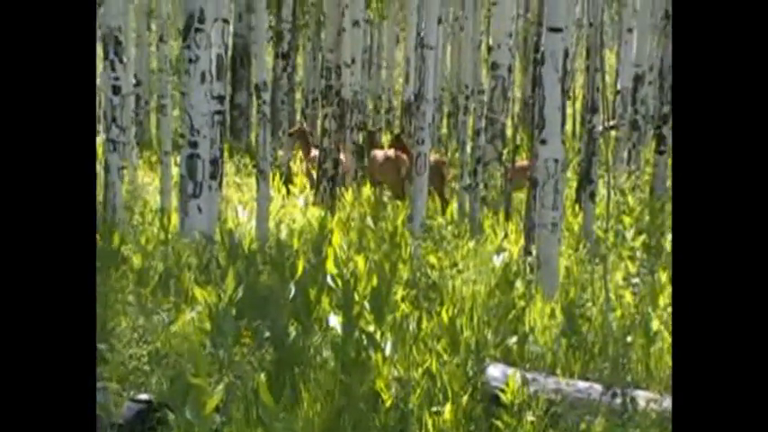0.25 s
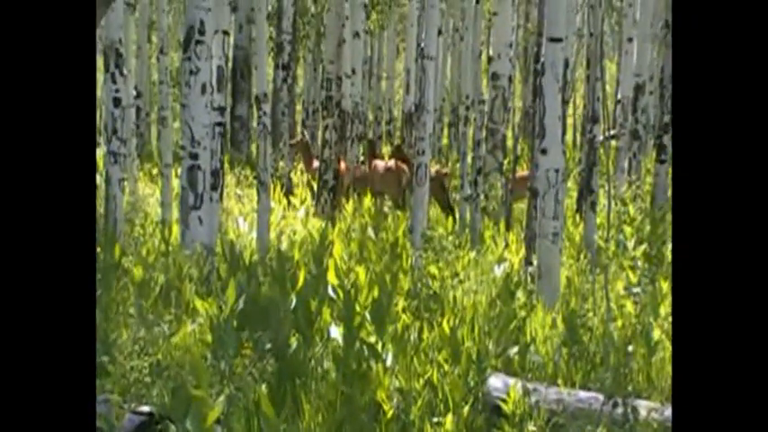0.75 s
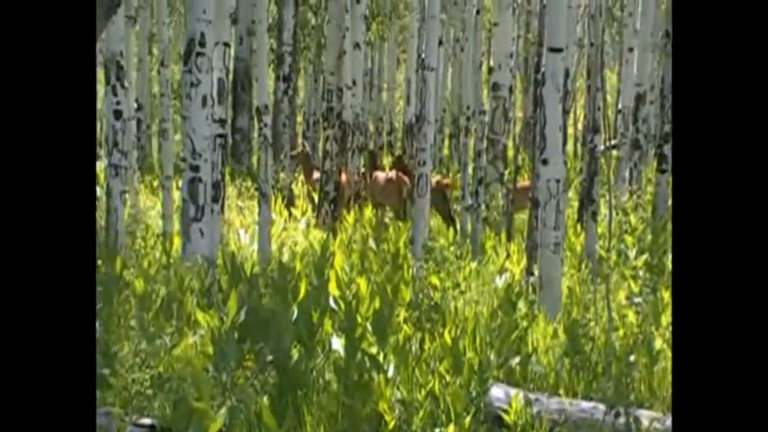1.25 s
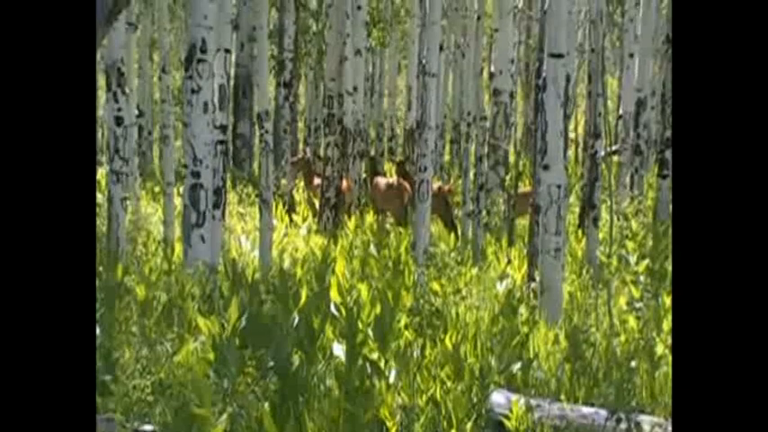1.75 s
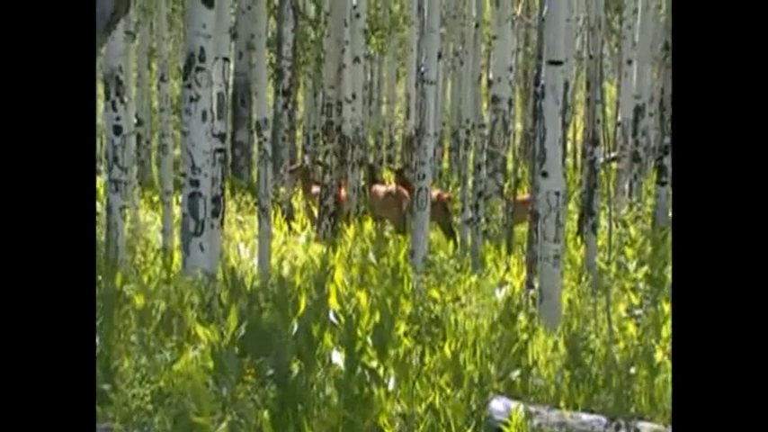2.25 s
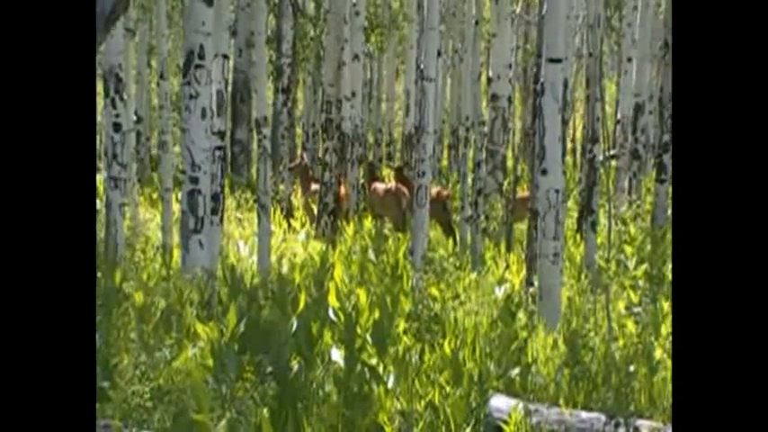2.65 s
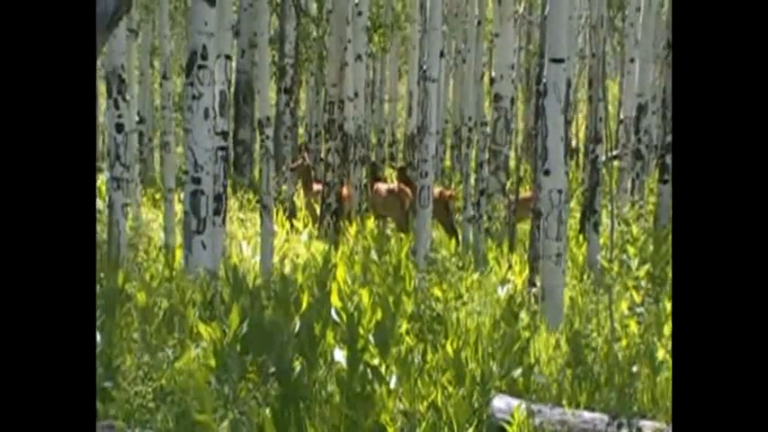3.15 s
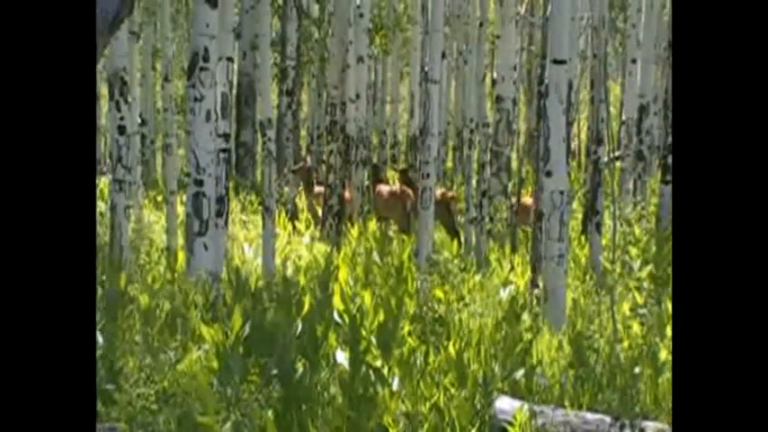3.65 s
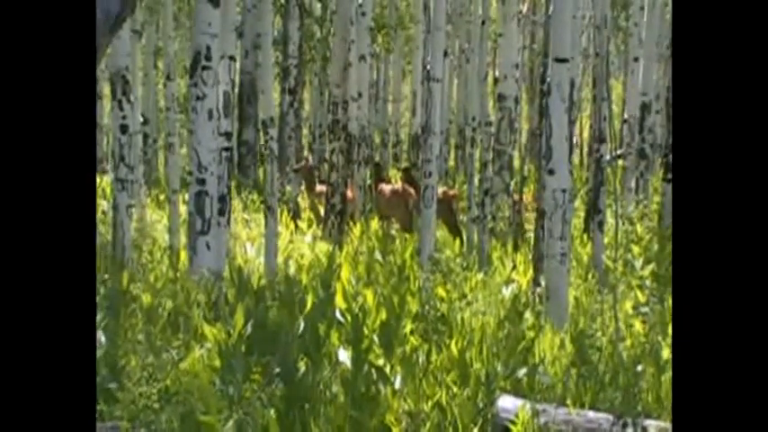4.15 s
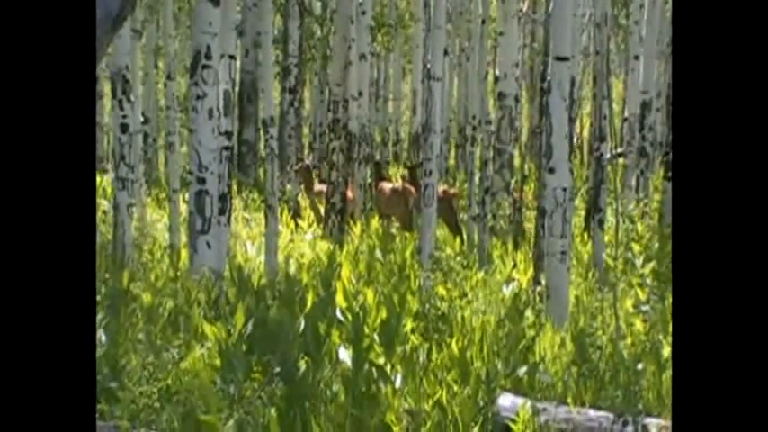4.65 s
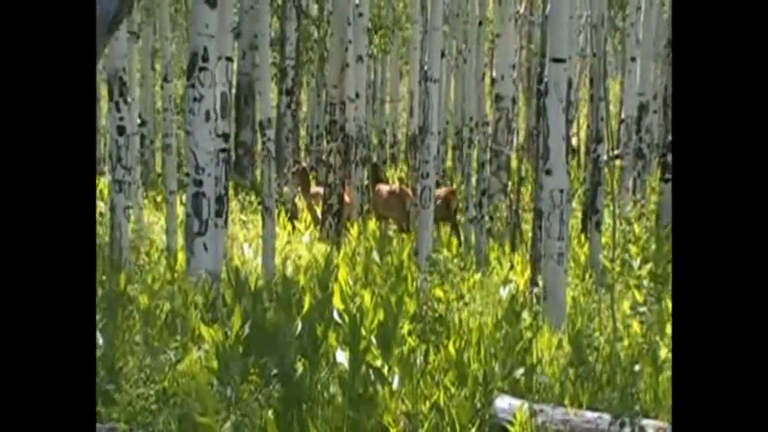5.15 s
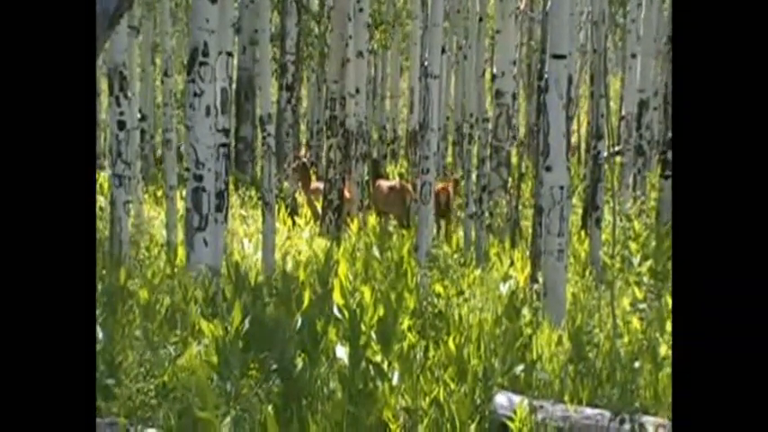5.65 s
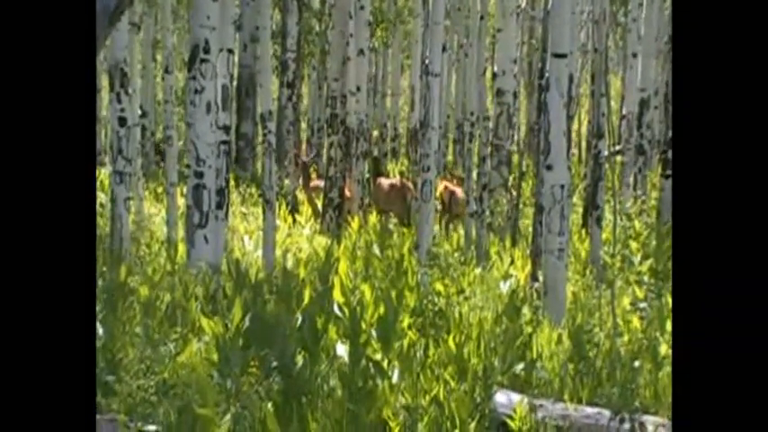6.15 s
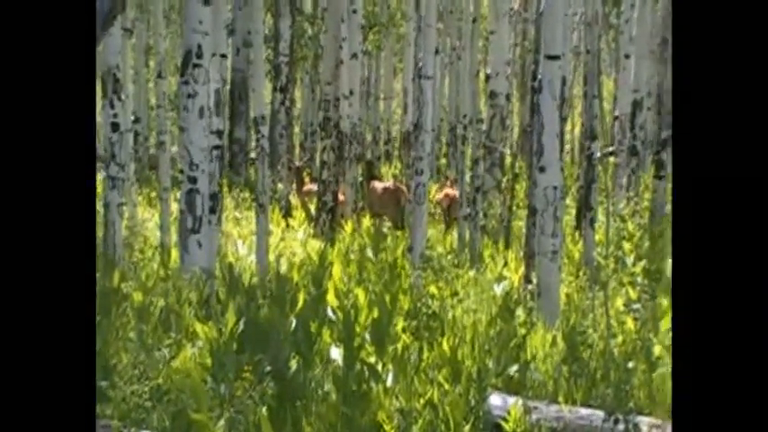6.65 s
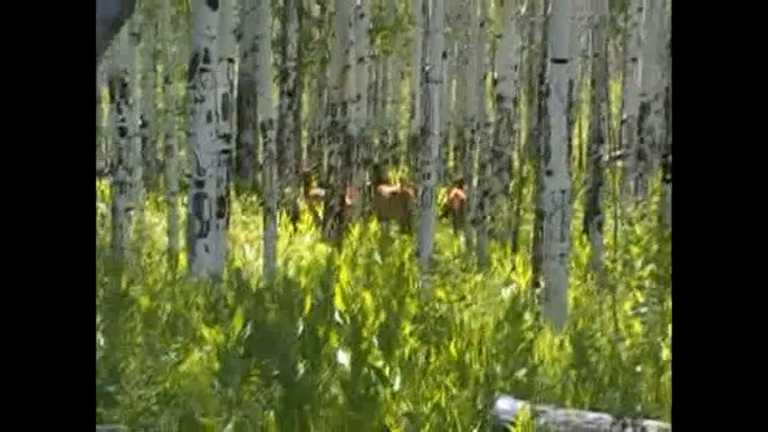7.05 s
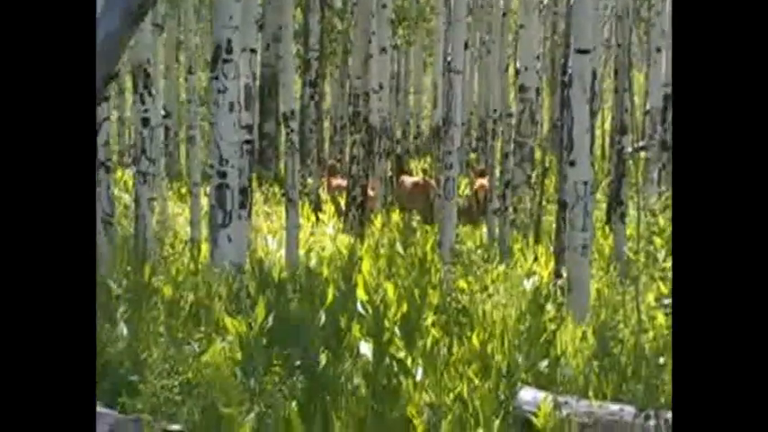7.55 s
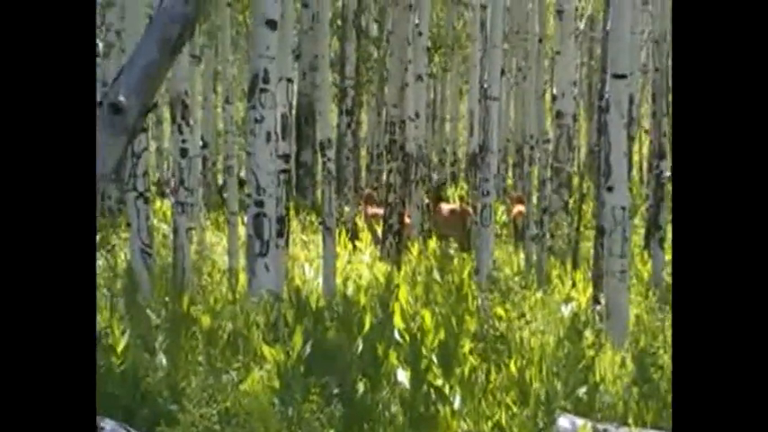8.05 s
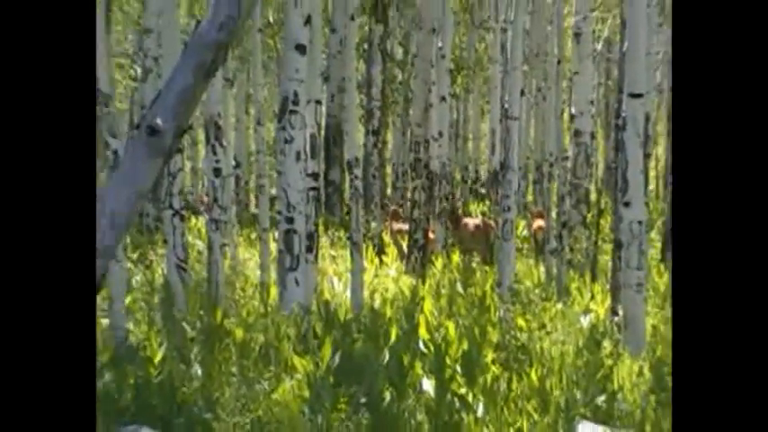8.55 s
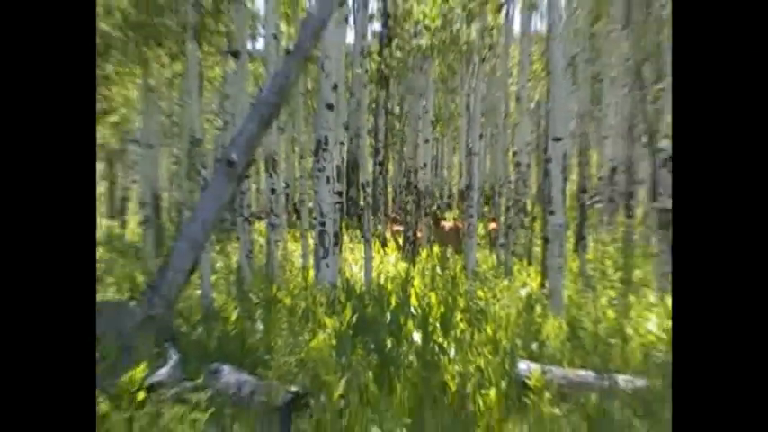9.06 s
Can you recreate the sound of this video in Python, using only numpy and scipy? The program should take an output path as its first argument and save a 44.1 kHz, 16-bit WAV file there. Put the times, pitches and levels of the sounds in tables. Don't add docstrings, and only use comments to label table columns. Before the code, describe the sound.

Outdoors in a leafy grove, short high elk mews hold then drop, hazily echoing, with far chirps, soft creaks and dry ticks near the microphone.

```python
import sys
import numpy as np
from scipy import signal
from scipy.io import wavfile
from scipy.ndimage import uniform_filter1d

SR = 44100
rng = np.random.default_rng(int(sys.argv[2]) if len(sys.argv) > 2 else 0)


def materialize(psi):
    bounded = np.clip(np.atleast_2d(psi).T, -1, 1)
    quanta = np.round(bounded * 32767).astype(np.int16)
    wavfile.write(sys.argv[1], SR, quanta)


def gain_from_db(level_db):
    decades = np.asarray(level_db, float) / 20
    return 10 ** decades


N = 410130

# (frequency [Hz], level per Hz [dB])
LEAF_COLOUR = [(25, -55), (55, -1), (200, -4), (550, -7.5), (850, -7.5), (1400, -8.5), (1900, -15.5),
               (2900, -11.5), (4300, -20), (5500, -15.5), (6500, -17), (9600, -28), (10400, -34.5),
               (15000, -21.5)]
# (frequency [Hz], likeness [0 to 1])
LEAF_LIKENESS = [(60, 0.99), (380, 0.96), (2380, 0.98), (15000, 0.87)]
# (frequency [Hz], left minus right [dB])
LEAF_LEAN = [(60, 2.7), (180, 7), (550, 5.7), (1650, 2.6), (4970, 1.6), (15000, 1.5)]
# (time [s], lift [dB])
STIR = [(0, 3), (.4, 0), (2.4, 1.5), (4, 0.5), (4.498, 5.5), (5.5, 3.5), (6, 4), (6.7, 7), (7.3, 3.5),
        (7.6, 4.5), (8.2, 4.5), (8.7, 5), (9.3, 3)]
# (frequency [Hz], level [dB])
EARLIER_ECHO = [(1460, -49.5), (2950, -55), (3550, -56)]
# (frequency [Hz], time to fall 60 dB [s])
GROVE_DECAY = [(800, 0.76), (1500, 0.5), (3000, 0.53), (6000, 0.49), (12000, 0.37)]
# (delay [s], level [dB])
NEAR_TRUNKS = [(.006, -10), (0.012, -9.5), (0.019, -13), (.035, -40)]
# (frequency [Hz], level [dB])
HAZE_COLOUR = [(1000, -12), (1500, -3), (3000, -2.5), (3750, -3), (5000, -5), (9000, 0.5)]
# (start [s], length
# [s], first pitch [Hz], last pitch [Hz], level [dB])
CHIRPS = [(1.238, 0.04, 2800, 2960, -59), (1.27, .07, 2950, 2850, -66), (1.44, .035, 3300, 3400, -67),
          (1.307, 0.046, 2350, 2230, -71), (1.394, 0.037, 2480, 2290, -69),
          (1.829, 0.038, 2720, 3104, -63), (2.04, 0.093, 2870, 2650, -71),
          (2.402, .02, 3950, 3400, -58), (5.67, .02, 2150, 2150, -60), (4.575, .025, 6600, 5500, -62),
          (4.52, .04, 6400, 7100, -66), (4.51, 0.11, 2150, 2820, -60), (4.61, 0.06, 2762, 2820, -39),
          (5.356, 0.069, 2790, 2235, -59.5), (5.921, 0.097, 3285, 2530, -57),
          (5.455, 0.018, 2645, 2270, -52), (6.403, 0.088, 2200, 2490, -64),
          (6.459, 0.054, 2450, 2130, -59.5), (7.463, 0.028, 2740, 2600, -61.5),
          (7.525, 0.054, 2450, 2650, -65), (7.722, .04, 2055, 2260, -61),
          (7.751, 0.13, 2206, 2010, -62.5), (7.595, .045, 2150, 2720, -59),
          (5.82, .065, 4520, 4240, -62.5), (6.955, .045, 3900, 3040, -64),
          (7.878, 0.14, 1950, 1864, -59), (5.741, 0.051, 2810, 2930, -56),
          (5.875, 0.025, 2715, 2540, -51), (8.462, 0.16, 2290, 2090, -60.5),
          (8.728, .02, 2900, 2750, -58), (8.745, .027, 2990, 2750, -54.5), (8.79, .09, 2500, 2580, -66),
          (8.87, .05, 2570, 2350, -64), (8.965, 0.07, 2900, 2300, -56),
          (1.414, 0.024, 2830, 2670, -62), (2.013, 0.04, 5760, 4600, -77),
                   (2.13, 0.032, 5750, 4930, -69), (2.25, 0.036, 5630, 4470, -79),
                   (4.14, 0.043, 6700, 7240, -70), (4.201, .055, 7500, 5618, -67),
                   (4.334, 0.049, 7440, 5700, -67), (4.447, 0.049, 7000, 5200, -62),
                   (7.982, 0.12, 2640, 2024, -47.5), (7.985, 0.029, 3900, 3650, -59),
                   (8.019, .05, 3620, 3290, -51), (8.095, .03, 2760, 2700, -54),
                   (8.115, .04, 2700, 2150, -54), (8.25, .045, 4050, 3450, -60),
                   (7.69, .05, 1900, 2130, -65), (8.216, 0.079, 2525, 1620, -55),
                   (8.29, 0.06, 1600, 1450, -58), (6.225, .03, 3500, 3150, -53),
                   (5.98, .06, 2900, 2550, -63), (8.465, .035, 3600, 3780, -64),
                   (8.495, .09, 3790, 3590, -60), (8.45, .088, 3030, 2960, -65),
                   (8.583, .03, 2700, 2600, -56), (8.625, .02, 2560, 2520, -62),
                   (8.735, .02, 3320, 3200, -61), (8.755, .028, 3400, 3230, -57),
                   (8.898, .11, 2930, 2200, -61), (9.0, .05, 2950, 2400, -55), (8.96, .03, 3350, 3250, -62),
                   (9.01, .045, 3150, 2700, -61), (9.284, 0.033, 3160, 3200, -63)]
# (time [s], peak level [dB], ring [Hz])
KNOCKS = [(0.173, -47, 790), (0.399, -47.5, 1420), (1.237, -44, 737), (3.176, -38, 860),
          (3.775, -34.5, 1460), (4.595, -39, 895), (5.139, -32.5, 915), (5.44, -50.5, 660),
          (5.795, -43, 1190), (6.002, -47, 975), (6.102, -43, 1120), (6.685, -47, 490), (6.782, -41, 790),
          (7.02, -45.5, 840), (7.269, -43, 860), (7.359, -47, 970), (7.669, -39.5, 800), (7.703, -41, 820),
          (7.792, -40, 754), (7.824, -49, 670), (8.347, -49, 870), (8.487, -49.5, 790), (8.748, -41.5, 803),
          (8.936, -40.5, 770)]
# (time [s], peak level [dB], ring [Hz])
THUMPS = [
    (2.194, -59, 107),
    (5.462, -54, 184.4),
]
# (frequency [Hz], decay rate [1/s], level [dB])
SHELL_RINGS = [(1394, 140, -10.5), (584, 650, 3.5)]
# (time [s], peak level [dB], centre [Hz], length [s])
TICKS = [(4.069, -56, 6500, 0.0055), (4.113, -49.5, 6960, 0.0021), (4.183, -52, 6790, 0.0032),
         (5.133, -58, 7300, 0.01), (6.029, -45.5, 7550, 0.0087), (7.717, -48, 7160, 0.0025),
         (7.791, -41, 6800, 0.0028), (7.998, -55, 6800, 0.0075), (8.064, -43, 7700, 0.0012),
         (8.49, -33, 9200, 0.0014), (9.032, -49.5, 7200, 0.0044), (3.178, -59, 8000, 0.0024),
         (5.953, -69, 8190, 0.005), (6.022, -59, 9000, 0.0035), (6.1, -58, 9000, .003),
         (7.363, -53, 7050, .003), (8.154, -50, 10000, 0.0017), (7.08, -64.5, 8550, 0.085),
         (7.19, -63, 8300, 0.17), (8.487, -54, 9000, 0.0013), (8.584, -57, 7800, 0.0026),
         (4.42, -82, 8800, 0.011), (4.47, -74, 8000, 0.011)]
# (time [s], peak level [dB], centre [Hz], length [s])
SNAPS = [
    (0.397, -55, 2600, 0.006),
    (3.678, -52, 3070, 0.021),
    (4.444, -50, 5450, 0.0052),
    (4.595, -52, 7500, .003),
    (6.104, -47.5, 2274, 0.01),
    (7.021, -43, 1480, 0.0024),
    (7.269, -47, 1310, 0.004),
    (7.668, -49, 1500, 0.0023),
    (8.63, -55, 6400, 0.044),
]
# (start [s], length [s], level [dB], first ring [Hz], last ring [Hz])
CREAKS = [
    (0.0, 0.11, -54, 740, 830),
    (0.144, 0.096, -61.5, 820, 1020),
    (5.788, 0.14, -53.5, 1200, 1170),
    (6.668, 0.11, -57, 1050, 774),
    (6.811, 0.2, -57.5, 770, 895),
    (7, 0.22, -58.5, 900, 750),
    (7.195, 0.108, -54.5, 764, 900),
    (7.344, 0.091, -54.5, 930, 860),
    (7.661, 0.19, -58.5, 855, 814),
]
# (frequency [Hz], level [dB])
THROAT = [(2000, -30), (3000, 11), (3800, 2), (4500, -3), (5100, -7.5), (5550, 0.5), (6000, -16.5),
          (6900, -5), (7400, -9), (9000, -17), (10500, -21), (12000, -15), (14500, -17), (16000, -23)]
# (frequency [Hz], level [dB])
VOWEL = [(800, -7), (1100, 4), (1400, 1), (1800, -0.5), (2300, -7), (2900, 1), (3500, 6.5), (4400, -2.5)]
# (start [s], held pitch [Hz], effort [dB], swell [s], fade over the fall [dB])
MEWS = [(2.41, 1564, -32, 0.12, -17), (2.472, 1494, -24.5, 0.025, 43), (2.67, 1399, -33, 0.3, 22.5),
        (3.591, 1442, -34, 0.11, 16.5), (3.691, 1486, -28, 0.082, 29), (4.509, 1395, -29, 0.16, 11.5),
        (4.89, 1440, -34, 0.053, -15), (4.93, 1391, -22, 0.047, 32), (5.159, 1132, -54.5, 0.075, 4.5),
        (5.682, 1500, -55.5, 0.061, 5.5), (6.15, 1756, -44.5, 0.038, 15.5), (6.381, 1469, -57.5, 0.15, -8),
        (6.457, 1482, -28.5, 0.056, 31), (6.811, 1051, -54, 0.071, 8.5), (7.59, 1510, -44.5, 0.22, 0.5),
        (8.022, 1408, -53, 0.1, 3), (9.262, 1354, -62.5, 0.013, -10)]
# (onset pitch [Hz], hold [s], fall [s], final pitch [Hz], bend [+ flattens, - steepens])
TUNES = [(1590, .038, .02, 1400, -1), (1520, .103, .135, 860, .8), (1436, .105, .135, 765, .4),
         (1290, .213, .13, 820, 1.2), (1391, .14, .15, 900, -.1), (1340, .2, .14, 845, 1.3),
         (1520, .045, .01, 1405, .1), (1415, .073, .1, 890, .2), (1020, .09, .09, 980, -1),
         (1310, .16, .21, 840, .3), (1805, .07, .11, 1050, -.1), (1300, .085, .01, 1455, .1),
         (1460, .08, .145, 905, -.2), (780, .075, .11, 770, -3.2), (1030, .32, .19, 985, -.8),
         (1130, .162, .118, 885, -.6), (1385, .012, .03, 1290, .5)]
# (1st overtone [dB], 3rd and higher [dB], change of the 1st over the hold [dB],
# change of the 1st once the fall begins [dB], change of the 2nd once the fall begins [dB])
MOUTHS = [(-8, -3.5, 0, 7, -9), (0.5, -1, -7.5, -20, 5), (-8.5, 1.2, -12.5, 6, 0), (-6, 0, -4.5, -3.5, -6),
          (4, -1.5, -8.5, -12, 7.5), (-11, -4, -8, 1.5, -5), (0, -4, 6, 6, -0.5),
          (-3.5, -21, -7.5, -18, -2.5), (-30, -8, -3, 8.5, 0.5), (-5, -8, 7, 0, 4), (-2, 0, -5, -5, -7),
          (18, 6.5, -4, -1, -3), (-19.5, -4.5, -12.5, 23.5, 1), (-18, 6, -31, 5, -2),
          (-11, -15.5, -4, 4, -2.5), (-2.5, 0, 7, 0, 3), (14.5, -40, -13, -11.5, 9)]
# (pitch droop late in the hold [share], extra loss per upper overtone [dB],
# change of the 3rd once the fall begins [dB], loss in high air [dB per kHz], echo [dB])
ENDINGS = [(.001, -1.5, 4, 3, 3.5), (.001, 3, -2, 0.3, -2.5), (.001, 1, -3.5, 1, 2),
           (.045, 0.9, -3.5, 1.5, 2.5), (.001, 4, -2, -0.5, -0.7), (.003, 2, -2.5, 0, 2),
           (.001, 2, -4, 9, -11.5), (.001, -1, 3, 1.5, -3.5), (.001, 4, 1, -1.5, 6), (.001, -4, 0.5, 4, 2),
           (.001, 10, -1, 0.1, 1.5), (.001, -9, -2, 5, 0.1), (.001, 1.5, -2.5, 2.5, 3),
           (.001, -3, 8, 1, -11), (.001, 11, 1.5, 0.1, 2.5), (0.031, 4.5, 5, -3, -4), (.001, 11, 0, 0.1, 2)]
# (time [s], overtone [number], change [dB], half width [s])
CANCELS = [(2.536, 2, -3.5, 0.015), (2.52, 3, -23, 0.0046), (2.565, 2, 3.5, 0.025), (3.738, 2, -11, 0.006),
           (3.784, 2, -12, 0.0058), (3.755, 1, 2.5, 0.018), (3.695, 2, 2, 0.01), (4.592, 2, -7, .006),
           (4.66, 2, -11, 0.014), (4.682, 2, 3.5, 0.014), (4.724, 2, -11, 0.0038), (6.528, 2, -21, 0.011),
           (6.527, 3, -12, 0.0033), (6.55, 2, -11.5, 0.0063), (6.54, 1, -11, 0.0091), (7.73, 1, 0, 0.044),
           (7.82, 1, -9, 0.052), (7.88, 1, 0, 0.026), (5.74, 3, -13, .05), (4.962, 1, 2.5, 0.021),
           (5.0, 1, -5.5, 0.013), (8.215, 3, -1, .02), (4.74, 3, 4.5, 0.03), (7.965, 3, -7, .02),
           (8.045, 3, -4.5, 0.052), (6.62, 3, -3, 0.03), (6.985, 4, -1, 0.012), (6.93, 3, 6, .04),
           (6.25, 3, -1, .04), (6.155, 2, -11, 0.011), (3.605, 2, 0, .015), (2.7, 3, 2, 0.033)]


def read(points, hz):
    f, value = np.transpose(points)
    return np.interp(np.log(hz + 1), np.log(f + 1), value)


def evened(x):
    return x / np.sqrt(np.mean(x ** 2) + 1e-20)


def add(mix, s, sound):
    part = mix[round(max(s, 0) * SR):][:len(sound)]
    part += sound[:len(part)]


def resonate(x, hz, width):
    turn = np.exp(2j * np.pi * np.cumsum(hz * np.ones(x.shape[-1])) / SR)
    r = np.exp(-np.pi * width / SR)
    return 2 * (turn * signal.lfilter([1 - r], [1, -r], x / turn)).real


def wobble(count, smooth_s):
    span = max(int(smooth_s * SR), 2)
    noise = rng.standard_normal(SR * 4 // 5)[:count]
    return evened(uniform_filter1d(uniform_filter1d(noise, span), span))


def faded(length_s, fade_s):
    t = np.arange(0, length_s, 1 / SR)
    return t, np.clip(np.minimum(t, length_s - t) / fade_s, 0, 1)


def leaves():
    level_db = -54
    frames, hz = N // 256 + 5, np.fft.rfftfreq(1024, 1 / SR)
    a, b, c, d, patches = rng.standard_normal((frames, 513, 5)).T
    patches = evened(uniform_filter1d(uniform_filter1d(patches, size=12, axis=0), size=14, axis=1))
    flicker = evened(uniform_filter1d(rng.standard_normal(frames), size=4))
    stir_db = np.interp(np.arange(frames) * 256 / SR, *np.transpose(STIR))
    reach = read([(150, 0.083), (1000, 1.08), (5500, 1.16), (9000, 1.67), (11000, 0.67)], hz)[:, None]
    same = np.clip(read(LEAF_LIKENESS, hz), -1, 1)[:, None]
    lean_db = read(LEAF_LEAN, hz)[:, None] / 2
    left = a + 1j * b
    right = same * left + np.sqrt(1 - same ** 2) * (c + 1j * d)
    z = np.array([left * gain_from_db(lean_db), right / gain_from_db(lean_db)])
    patch_db = read([(200, .3), (1500, 1.1)], hz)[:, None] * patches
    z *= gain_from_db(read(LEAF_COLOUR, hz)[:, None] + patch_db)
    calm = np.sqrt(np.mean(signal.istft(z, nperseg=1024, noverlap=768)[1] ** 2))
    z *= gain_from_db(reach * (stir_db + 1.1 * flicker))
    return gain_from_db(level_db) / calm * signal.istft(z, nperseg=1024, noverlap=768)[1][:, :N]


def insects():
    band_hz, width_hz, beat_hz, level_db = 5720, 600, 31, -65.0
    drift, swell = evened(uniform_filter1d(rng.standard_normal((2, N)), size=5000))
    beat = np.cumsum(beat_hz * (1 + .15 * drift)) / SR
    hiss = resonate(resonate(rng.standard_normal(N), band_hz, width_hz), band_hz, width_hz)
    throb = 1 + .6 * np.sin(2 * np.pi * beat)
    return gain_from_db(level_db + 2.2 * swell) * evened(hiss) * throb


def earlier_echo():
    t = np.arange(SR) / SR
    return sum(gain_from_db(db - 46 * t) * evened(resonate(rng.standard_normal(SR), hz, 170))
               for hz, db in EARLIER_ECHO)


def grove(x):
    taps = np.zeros((2, 2 * SR))
    at = np.arange(300, 2 * SR - 20, 20) + rng.integers(0, 20, (2, (2 * SR - 301) // 20))
    np.put_along_axis(taps, at, rng.choice([-1., 1.], at.shape), 1)
    taps[1] = 1.05 * taps[0] + 0.17 * taps[1]
    hz, t, z = signal.stft(taps, SR, nperseg=256)
    near = gain_from_db(-60 * t / read(GROVE_DECAY, hz)[:, None])
    far_slope = gain_from_db(-20.5 - 60 * t / 3.0)
    shape = (near + far_slope) * gain_from_db(read(HAZE_COLOUR, hz))[:, None]
    build_up = 1 - np.exp(-t / 0.0057)
    tail = signal.istft(z * shape * build_up, SR, nperseg=256)[1]
    tail = tail / np.linalg.norm(tail[0])
    for s, db in NEAR_TRUNKS:
        tail[:, round(s * SR)] += gain_from_db(db)
    return signal.fftconvolve(x[None], tail, axes=1)[:, :N]


def chirp(start, length_s, first_hz, last_hz, db):
    t, fade = faded(length_s, .008)
    hz = last_hz + (first_hz - last_hz) * (1 - t / length_s) ** 1.2
    shimmer_db = 2.5 * wobble(len(hz), .005)
    arch_db = db - 3 * (2 * t / length_s - 1) ** 2
    tone = np.sin(2 * np.pi * np.cumsum(hz) / SR)
    return start, np.sqrt(2) * gain_from_db(arch_db + shimmer_db) * tone * fade


def tick(db, hz, length_s):
    t = np.arange(3000) / SR
    puff = resonate(resonate(rng.standard_normal(len(t)), hz, 0.48 * hz), hz, 0.48 * hz)
    shape = np.exp(-t / max(length_s, .0005)) * (1 - np.exp(-t / 0.0004))
    return gain_from_db(db + 8.0) * evened(puff) * shape


def knock(db, hz):
    t = np.arange(6000) / SR
    ring = np.sin(2 * np.pi * hz * t)
    for mode_hz, decay, mode_db in SHELL_RINGS:
        ring = ring + gain_from_db(mode_db) * np.sin(2 * np.pi * mode_hz * t) * np.exp(-decay * t)
    return gain_from_db(db) * 1.98 * ring * np.exp(-(t * hz / 6.1) ** 2) * (1 - np.exp(-t / 0.0012))


def creak(start, length_s, db, first_hz, last_hz):
    t, fade = faded(length_s, 0.022)
    hz = first_hz + (last_hz - first_hz) * t / length_s
    slips = rng.standard_normal(SR // 2)[:len(t)] * gain_from_db(0.82 * wobble(len(t), 0.0018))
    return start, gain_from_db(db + 4.5) * fade * evened(resonate(resonate(slips, hz, 350), hz, 340))


def contour(t, held_hz, effort_db, swell_s, fade_db, onset_hz, held_s, fall_s, final_hz, bend,
            nasal_db, bright_db, open_db, first_db, second_db, droop, third_db):
    settle_s, let_go_s, knee_s = .03, .012, 0.031
    hold, fall = np.minimum(t / held_s, 1), np.clip((t - held_s) / fall_s, 0, 1)
    slide = np.expm1(-bend * fall) / np.expm1(-bend)
    settling = (onset_hz - held_hz) * (1 - hold) / (1 + t / settle_s)
    hz = (held_hz + settling) * (final_hz / held_hz) ** slide * (1 - droop * hold ** 3)
    hz = uniform_filter1d(hz, max(int(0.157 * held_s * SR), 2), mode="nearest")
    swell_db = -24 * np.maximum(1 - t / swell_s, 0) ** 3.58
    growth_db = 3.5 * np.clip(t - swell_s, 0, held_s)
    db = effort_db + swell_db + growth_db - fade_db * fall ** 1.35
    loose = -np.expm1(-fall * fall_s / let_go_s)
    dip_db = 4.5 * np.exp(-((t - held_s - knee_s) / knee_s) ** 2)
    mouth_db = [nasal_db + open_db * (hold ** 3 - .5) + first_db * loose,
                second_db * loose,
                bright_db * (1 - 1.21 * fall) - dip_db + third_db * loose]
    levels_db = [db + m + read(VOWEL, (k + 1) * hz) for k, m in enumerate(mouth_db)]
    facing = gain_from_db(-5.5 * fall)
    return hz, levels_db, facing


def mew(call, tune, mouth, ending):
    start, held_hz, *effort = call
    _, held_s, fall_s, *_ = tune
    droop, upper_loss_db, third_db, air_db, _ = ending
    t, fade = faded(held_s + fall_s, 0.0095)
    hz, low_db, facing = contour(t, held_hz, *effort, *tune, *mouth, droop, third_db)
    count, loudest_db = len(hz), np.max(low_db, 0)
    slack = np.maximum(np.log2(held_hz / hz), 0)

    dull_db = .18 * np.maximum(-34.0 - low_db[2], 0) + upper_loss_db
    levels_db = list(low_db)
    for k in range(4, 12):
        throat_db = read(THROAT, k * hz) - read(THROAT, 3 * hz)
        high_air_db = air_db * np.maximum(k * hz - 7600, 0) / 1000
        levels_db.append(low_db[2] + throat_db - dull_db * (k - 3) - high_air_db)
    for s, overtone, db, half_s in CANCELS:
        k = round(overtone) - 1
        levels_db[k] = levels_db[k] + db * np.exp(-((start + t - s) / half_s) ** 2)

    flutter_db = np.clip(40 * (slack - .03) + .02 * np.maximum(-38 - loudest_db, 0), .3, 3.5)
    turns = np.cumsum(hz * (1 + 0.021 * slack * wobble(count, .003))) / SR
    voice = 0
    for k, db in enumerate(levels_db):
        unsteady_db = flutter_db * wobble(count, 0.0057) + 1.0 * wobble(count, .02)
        voice = voice + gain_from_db(db + unsteady_db) * np.sin(2 * np.pi * (k + 1) * turns)
    breath = evened(resonate(rng.standard_normal(SR)[:count], 5000, 5000)) * gain_from_db(loudest_db - 36.0)
    return start, (np.sqrt(2) * voice + breath) * fade, facing


def scene():
    to_trunks, direct, far, hand = np.zeros((4, N))
    for row in CHIRPS:
        add(far, *chirp(*row))
    for s, *snap in TICKS + SNAPS:
        add(hand, s, tick(*snap))
    for s, *blow in KNOCKS + THUMPS:
        add(hand, s, knock(*blow))
    for row in CREAKS:
        add(hand, *creak(*row))
    for call, tune, mouth, ending in zip(MEWS, TUNES, MOUTHS, ENDINGS):
        start, voice, facing = mew(call, tune, mouth, ending)
        add(to_trunks, start, voice * gain_from_db(ending[4]) / facing ** 0.34)
        add(direct, start, voice * facing)

    trembling = 1 + .28 * evened(uniform_filter1d(rng.standard_normal(N), max(round(.008 * SR), 2)))
    echoes = gain_from_db(-6.5) * grove((to_trunks + 1.9 * far) * trembling) * trembling[::-1]
    woods = direct + 2.24 * far + np.pad(earlier_echo(), (0, N - SR)) + insects() + echoes
    shaded = woods + np.array([[0.14], [-0.14]]) * resonate(woods, 8300, 1100)
    herd_pan_db, hand_pan_db = np.array([[1.05], [-1.05]]), np.array([[2.5], [-3.5]])
    return shaded * gain_from_db(herd_pan_db) + hand * gain_from_db(hand_pan_db) + leaves()


def low_pass(x):
    return signal.sosfilt(signal.butter(12, 16440, fs=SR, output="sos"), x)


def record(dry):
    below_step = signal.sosfilt(signal.butter(8, 9900, fs=SR, output="sos"), dry)
    above_step = signal.lfilter(*signal.butter(2, 14500, fs=SR), dry)
    duller = 0.9 * below_step + 0.21 * above_step
    mix = signal.lfilter(*signal.butter(2, 32, "high", fs=SR), duller)
    return low_pass(mix)


dry = scene()
out = record(dry)
materialize(out)
```